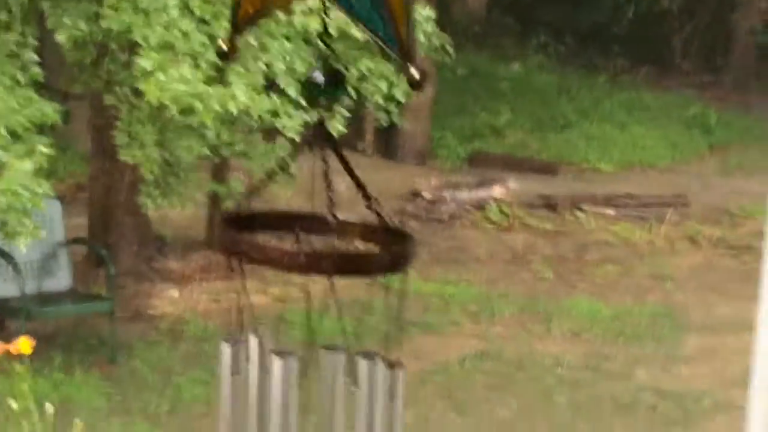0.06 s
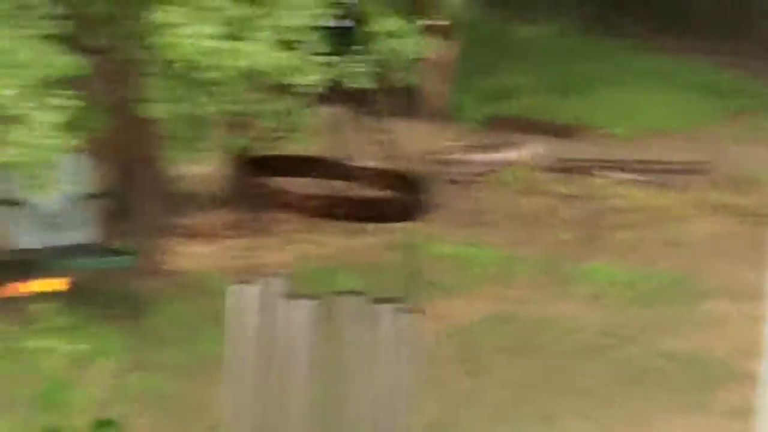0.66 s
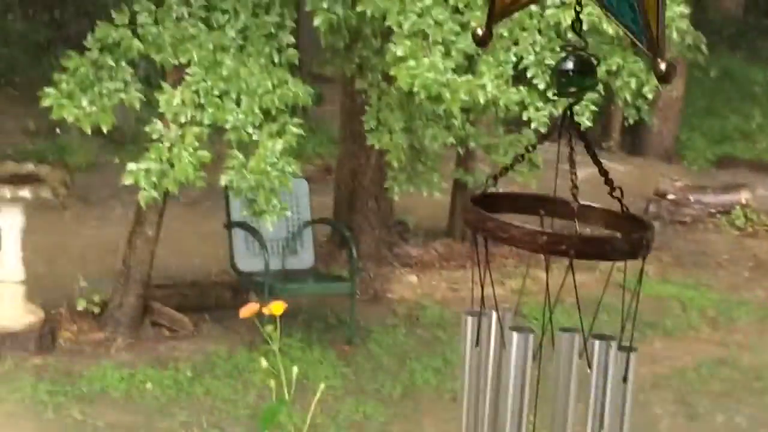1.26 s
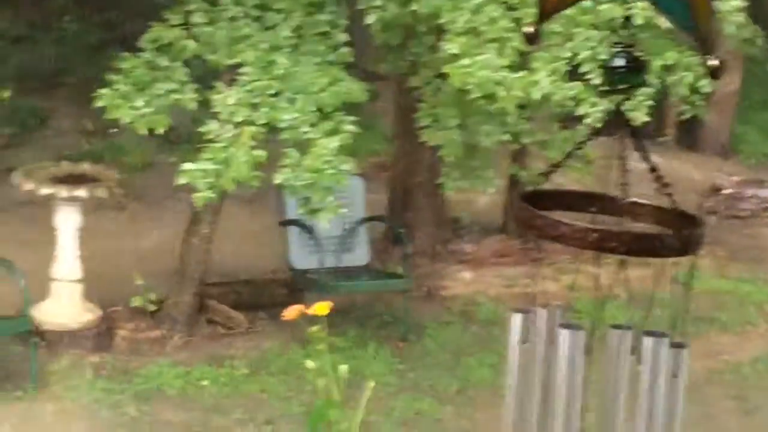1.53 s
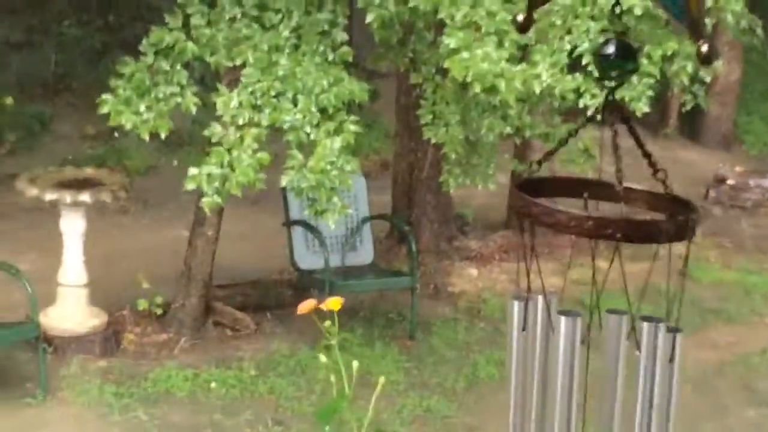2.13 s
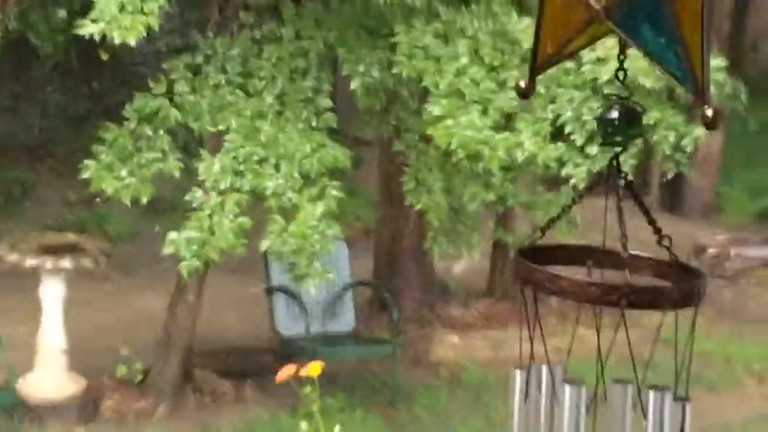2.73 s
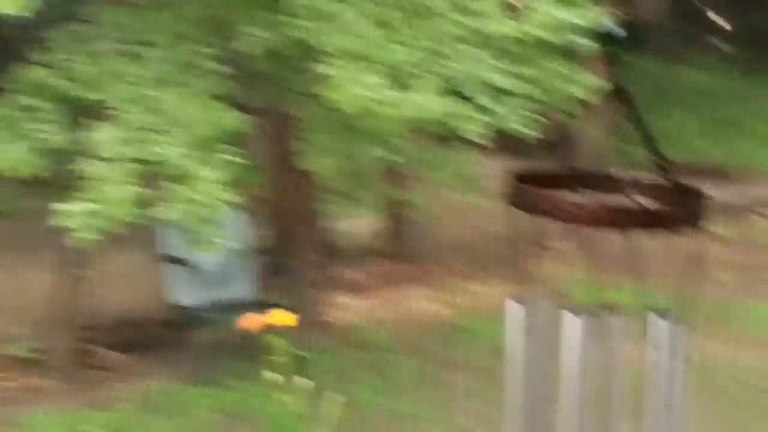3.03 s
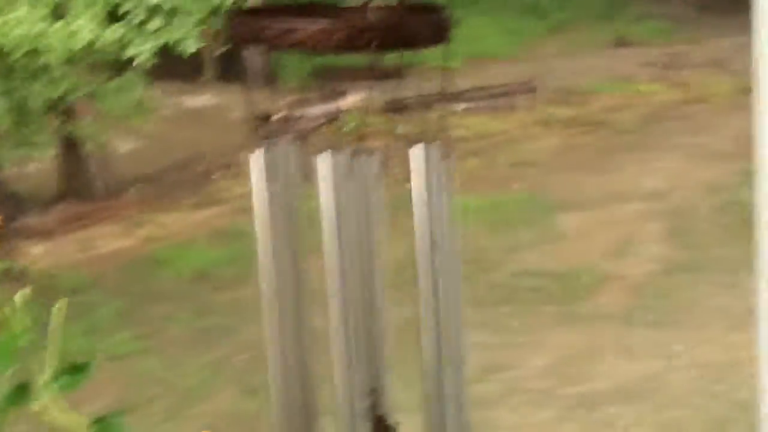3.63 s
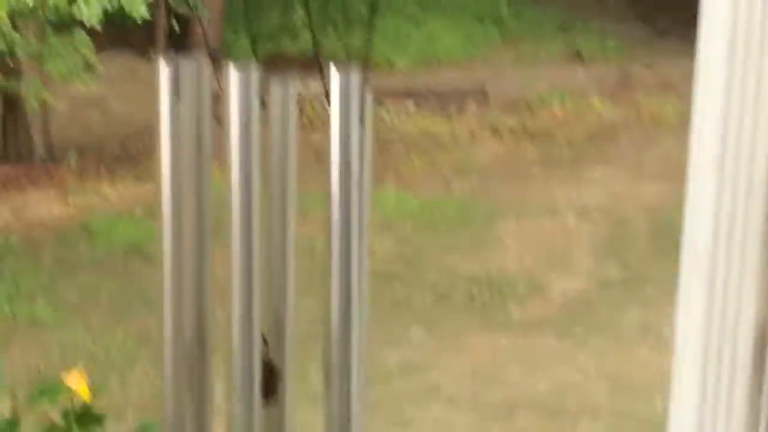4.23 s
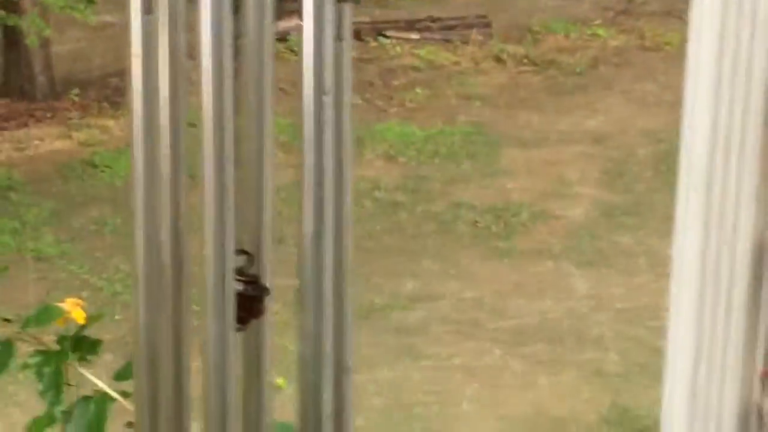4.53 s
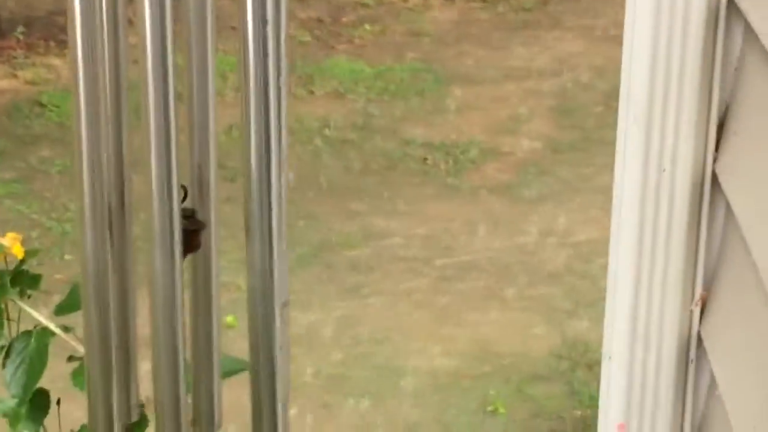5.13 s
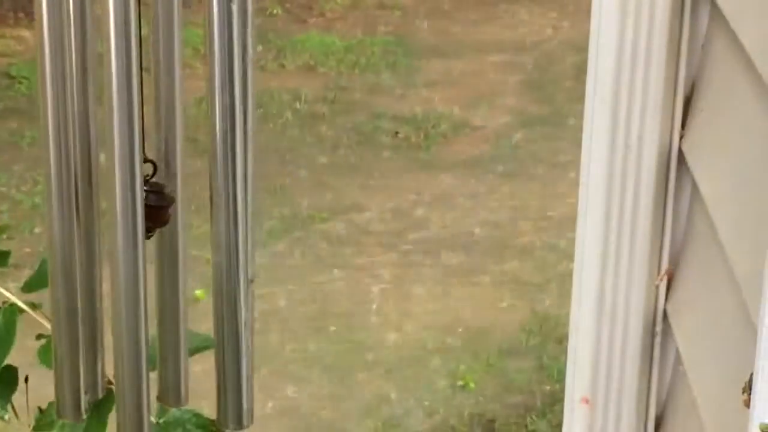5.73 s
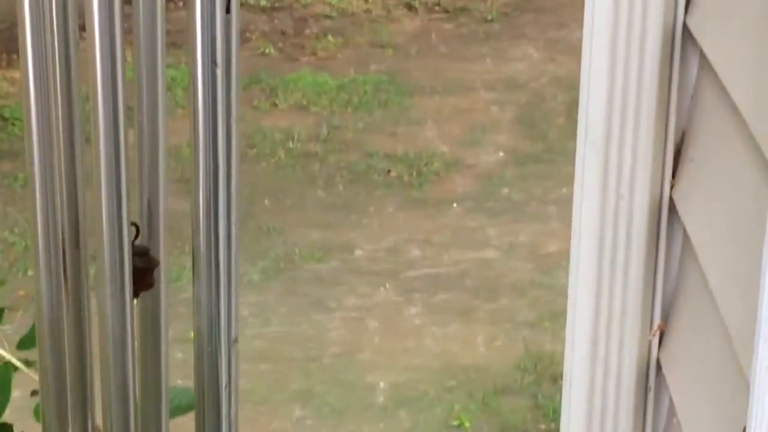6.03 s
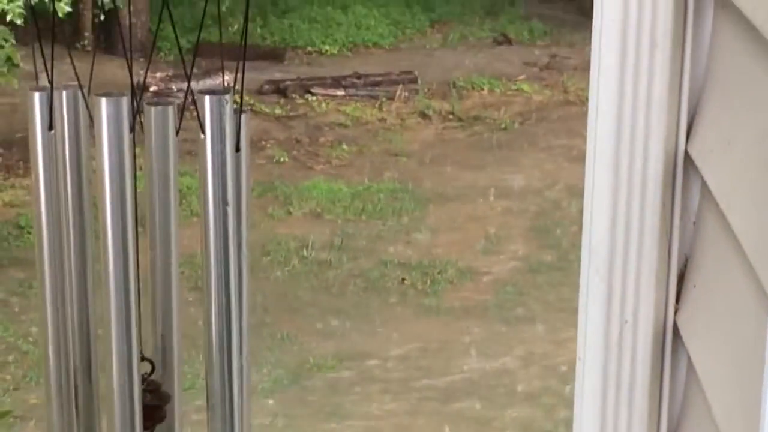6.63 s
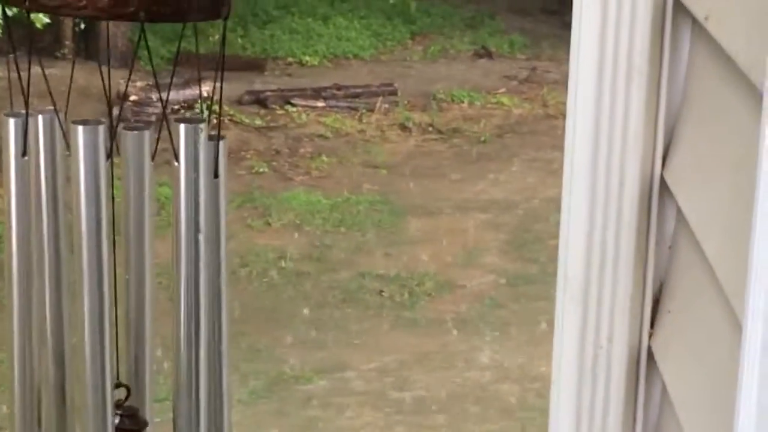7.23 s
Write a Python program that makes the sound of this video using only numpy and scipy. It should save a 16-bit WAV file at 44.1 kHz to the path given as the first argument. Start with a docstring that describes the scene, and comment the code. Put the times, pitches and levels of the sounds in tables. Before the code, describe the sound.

A steady downpour on leaves and puddles, then close thunder rips, cracks loudly and rolls on.

```python
"""Heavy rain falls on a flooded backyard, heard from a porch: countless impacts superpose into a wash. Near the
end lightning strikes: a side branch thuds and tears, then the main channel sends a volley of shock waves and a
crackling roll. A limiter lowers the gain under the clap, so the rain ducks. Close by, single drops tick on the
porch and runoff splashes; a low rumble, a low drone and soft bumps lie behind. One microphone feeds both
channels."""
import sys
import numpy as np
from scipy import signal
from scipy.fft import rfft, irfft
from scipy.io import wavfile

SR = 44100
rng = np.random.default_rng(int(sys.argv[2]) if len(sys.argv) > 2 else 0)


def wrap_up_sound(samples):
    """Save the sound to the file named by the first command line argument, as 16-bit audio."""
    columns = np.atleast_2d(samples).T
    # keep every value between -1 and 1, then stretch to whole-number steps
    tamed = np.clip(columns, -1, 1)
    steps = np.round(tamed * 32767).astype(np.int16)
    wavfile.write(sys.argv[1], SR, steps)


N = 325017
TIME = np.arange(N) / SR


# Spectrum of rain on leaves. Each row: frequency in Hz, relative spectral level in dB.
LEAF_SPECTRUM = [(260, -4.5), (325, 1.5), (410, -3.5), (530, -0.5), (780, -2), (940, -1), (1400, 1),
                 (2200, -3), (2900, -2), (3700, -2), (4700, -3.5), (7100, -4), (10000, -9), (15000, -16.5)]
# Spectrum of rain on the flooded yard. Each row: frequency in Hz, relative spectral level in dB.
YARD_SPECTRUM = [(260, -2.5), (400, -3), (450, -1), (520, -2.5), (700, -1), (1000, -0.5), (1900, 0.5),
                 (3700, -1.5), (4900, -3.5), (7300, -4.5), (10000, -9), (15000, -16)]
def rain(level_db=-39.5, turn_s=2.8, turn_length_s=0.59):
    """Incoherent sources add in power: the level holds as the microphone turns from trees to yard."""
    yard_share = np.interp(TIME, [turn_s, turn_s + turn_length_s], [0.13, 1])
    leaves = coloured(shower(per_s=3000, spread_db=3.0, near_db=-5.5, flutter_db=0.7), LEAF_SPECTRUM)
    yard = coloured(shower(per_s=3000, spread_db=3.5, near_db=-5.5, flutter_db=0.5), YARD_SPECTRUM)
    puddles = from_db(-14) * bubbles(per_s=180, quality=25)
    return from_db(level_db) * (np.sqrt(1 - yard_share) * leaves + np.sqrt(yard_share) * yard + puddles)


def shower(per_s, spread_db, near_db, flutter_db, count=16):
    """Superposition: far drops merge into Gaussian noise, while near ones stay distinct spatters."""
    near = rms_one(sum(scatter(impacts(per_s / count, spread_db), decay_s=0.00067) for _ in range(count)))
    direct = (rng.standard_normal(N) + from_db(near_db) * near) * from_db(flutter_db * drift(19))
    # fine spray close by comes in flurries
    flurries = rms_one(impacts(per_s=1500, spread_db=2.5) * from_db(5.5 * drift(14)))
    spray = from_db(-7.5) * butter(flurries, 12000, "high", order=3)
    porch_reflection = from_db(-17) * butter(scatter(direct, decay_s=0.017), 4300, "low")
    return direct + spray + porch_reflection


def bubbles(per_s, quality, count=24):
    """Bubble resonance: air trapped by drops in puddles rings briefly, each size at its own pitch."""
    rings = (resonance(impacts(per_s / count, 1.4), hz, hz / quality)
             for hz in np.geomspace(900, 7500, count))
    return rms_one(sum(rms_one(ring) for ring in rings))


# The strongest shock fronts. Each row: start in seconds, level in dB, duration in seconds.
SHOCK_FRONTS = [(6.656, -20, .0036), (6.674, -22, 0.0018), (6.692, -18, 0.0024), (6.718, -18, .0062),
                (6.845, 1, 0.00502), (6.848, -4, 0.0074), (6.858, 1.5, 0.0059), (6.892, 7, .0025),
                (6.919, 4.5, 0.0054), (6.949, 6, .0037), (6.966, 2.5, 0.0057), (7.014, 0, .0028),
                (7.048, 5.5, 0.00487), (7.102, 4, 0.004), (7.161, 2, .0054), (7.22, 4, .0031),
                (7.234, 5.5, .0046), (7.27, 3.5, 0.0024), (7.312, 2, .003)]
def shocks(air_cutoff_hz):
    """Each front is an N-wave, rounded by air absorption; the microphone loses its lowest part."""
    fronts = np.zeros(N)
    for start_s, db, length_s in SHOCK_FRONTS:
        add(fronts, start_s, from_db(db) * np.linspace(1, -1, int(length_s * SR)))
    rounded = butter(fronts, air_cutoff_hz, "low", order=4)
    return butter(rounded, 72, "high", order=3)


# Spectra of the thunder's four parts. Each row: frequency in Hz, relative spectral level in dB.
THUD_SPECTRUM = [(40, -17), (110, -6), (190, 2), (310, -11), (450, -1), (650, -17), (1000, -24)]
TEAR_SPECTRUM = [(400, -25), (800, -7), (1200, -1), (2400, -2), (4000, -11.5), (7000, -28.5), (12000, -55)]
BOOM_SPECTRUM = [(20, -27), (42, -7), (65, -6), (88, -2.5), (120, 1), (170, -1), (260, -3), (400, -12),
                 (600, -14), (1000, -21), (2000, -43)]
CRACKLE_SPECTRUM = [(250, -4), (450, -4), (680, -0.5), (1000, -6.5), (1500, -6), (2200, -16), (3200, -26),
                    (5000, -33.5), (8000, -40.5), (14000, -56)]
def thunder(branch_s=6.654, clap_s=6.838, roll_fall_db_per_s=0.7):
    """Every kink of the bolt sends a small shock; they superpose into thud, tearing, boom and crackle."""
    # a faint growl leads into the side branch: a hollow thud and a rip that hangs on
    growl = from_db(-36) * swell(start_s=6.6, rise_s=0.05, fall_db_per_s=roll_fall_db_per_s)
    thud = from_db(-28.5) * swell(branch_s, rise_s=0.0039, fall_db_per_s=102)
    rip = from_db(-29) * swell(branch_s, rise_s=0.045, fall_db_per_s=33)
    # the main channel booms at once; crackle and tearing build up after it
    boom = from_db(-10.5) * swell(clap_s, 0.03, roll_fall_db_per_s)
    crackle = from_db(-12.8) * swell(clap_s, 0.08, roll_fall_db_per_s)
    tear = from_db(-24) * swell(clap_s, 0.17, roll_fall_db_per_s)
    # each front drags a short rumble behind it and lifts the crackle
    wakes = sum(from_db(db) * swell(s, rise_s=0.0033, fall_db_per_s=400) for s, db, _ in SHOCK_FRONTS)
    bass = np.hypot(growl + boom, from_db(-13.5) * wakes)
    crackle *= np.hypot(1, from_db(-3) * wakes)
    tearing = ragged(impacts(per_s=3400, spread_db=1.0), patchy_db=3.0, rate_hz=28)
    roll = (thud * coloured(impacts(per_s=1500, spread_db=2.0), THUD_SPECTRUM)
            + np.hypot(rip, tear) * coloured(tearing, TEAR_SPECTRUM)
            + bass * coloured(impacts(per_s=1500, spread_db=2.0), BOOM_SPECTRUM)
            + crackle * coloured(impacts(per_s=2500, spread_db=0.5), CRACKLE_SPECTRUM))
    return ring_and_echo(roll + shocks(air_cutoff_hz=880))


def ragged(x, patchy_db, rate_hz, count=12):
    """Amplitude modulation, band by band: clusters of kinks favour one pitch, then another."""
    edges_hz = np.geomspace(350, 14000, count + 1)
    pairs = zip(edges_hz, edges_hz[1:])
    bands = [signal.sosfilt(signal.butter(2, p, "band", fs=SR, output="sos"), x + 1e-18) for p in pairs]
    return sum((-1) ** k * band * from_db(patchy_db * drift(rate_hz)) for k, band in enumerate(bands))


# Narrow peaks that give the thunder a hollow ring. Each row: frequency in Hz, width in Hz, gain in dB.
THUNDER_RESONANCES = [(86, 19, -10), (172.4, 41, -1.5), (317, 30, -12), (457, 43, -9), (683, 50, -10),
                      (927, 51, -4)]
# Reflections from porch, house and trees. Each row: delay in seconds, gain in dB.
REFLECTIONS = [(.0128, -20), (.029, -23.5), (.071, -16)]
def ring_and_echo(x):
    """Resonance and reflection: a hollow ring and delayed copies join the direct sound."""
    out = x + sum(from_db(db) * resonance(x, hz, width_hz) for hz, width_hz, db in THUNDER_RESONANCES)
    for delay_s, db in REFLECTIONS:
        add(out, delay_s, from_db(db) * x)
    return out


# Drops that hit the porch. Each row: start in seconds, level in dB before the high-pass.
PORCH_DROPS = [(.102, -18), (.188, -15), (.42, -21), (1.271, -24), (1.901, -18), (1.939, -20), (4.566, -18),
               (6.04, -11)]
def ticks(pitch_range_hz, decay_s):
    """A short impact has a wide spectrum: a drop on a hard surface snaps for about one cycle."""
    out, t = np.zeros(N), TIME[:SR // 100]
    for start_s, db in PORCH_DROPS:
        hz = rng.uniform(*pitch_range_hz)
        add(out, start_s, from_db(db) * np.exp(-t / decay_s) * np.cos(2 * np.pi * hz * t))
    return butter(out, 5000, "high")


# Runoff from the roof edge. Each row: start in seconds, level in dB, centre frequency in Hz.
RUNOFF = [(.106, -36.5, 2740), (.181, -34.5, 2850), (.48, -36, 4600), (.65, -37, 6500), (1.091, -38, 5000),
          (1.286, -35.5, 4700), (1.987, -35, 6500), (2.938, -35.5, 5200), (3.47, -40, 3600),
          (4.04, -40, 3100), (4.305, -35, 5500), (5.142, -39, 4600), (6.326, -36, 4400)]
def splashes(rise_s, decay_s, plop_hz=2600, widening=2.5, droplets_per_s=12000):
    """Break-up on impact: a whole blob plops; the finer it bursts, the higher and wider its band."""
    out, t = np.zeros(N), TIME[:SR // 5]
    envelope = (1 - np.exp(-t / rise_s)) * np.exp(-t / decay_s)
    for start_s, db, hz in RUNOFF:
        droplets = rng.standard_normal(len(t)) * (rng.random(len(t)) < droplets_per_s / SR)
        width_hz = max(widening * (hz - plop_hz), 250)
        spray = rms_one(butter(resonance(droplets, hz, width_hz), 10400, "low"))
        add(out, start_s, from_db(db) * envelope * spray)
    return out


# Spectrum of the rumble behind the rain. Each row: frequency in Hz, relative spectral level in dB.
RUMBLE_SPECTRUM = [(20, -28), (40, -5), (65, -1), (110, 0), (150, -2), (205, -0.5), (260, -6), (330, -16)]
def rumble(level_db=-50, flutter_db=1.3):
    """Filtered noise: a low band whose level wavers slightly."""
    noise = rng.standard_normal(N) * from_db(flutter_db * drift(8.6))
    return from_db(level_db) * coloured(noise, RUMBLE_SPECTRUM)


# Swelling and fading of a low drone. Each row: time in seconds, level in dB.
DRONE_LEVELS = [(0, -56), (.8, -64), (1.35, -52), (2.1, -68), (2.85, -56), (3.9, -59), (4.45, -49),
                (5.0, -57), (6.5, -52)]
def drone(pitch_hz=78, waver_hz=5.77):
    """Random frequency and amplitude modulation make a bass tone waver."""
    phase = 2 * np.pi * np.cumsum(pitch_hz + waver_hz * drift(13.8)) / SR
    level_db = np.interp(TIME, *np.transpose(DRONE_LEVELS)) + 1.7 * drift(20)
    return from_db(level_db) * rms_one(np.sin(phase))


# Soft low bumps. Each row: start in seconds, envelope peak in dB.
BUMPS = [(.89, -41), (1.585, -46), (3.295, -40), (4.126, -38.5), (5.251, -37.5), (6.095, -38)]
def thumps(mean_hz, rise_s, decay_s):
    """Damped oscillation: each dull bump dies within a few cycles."""
    out, t = np.zeros(N), TIME[:SR // 3]
    envelope = (1 - np.exp(-t / rise_s)) * np.exp(-t / decay_s)
    envelope /= envelope.max()
    for start_s, db in BUMPS:
        hz = mean_hz * rng.uniform(0.86, 1.14)
        add(out, start_s, from_db(db) * envelope * np.sin(2 * np.pi * hz * t))
    return out


def impacts(per_s, spread_db):
    """A Poisson process: clicks at random moments, many small and a few large; unit power."""
    sizes = from_db(spread_db * np.minimum(rng.exponential(1, N), 5)) * rng.choice([-1, 1], N)
    return rms_one(sizes * (rng.random(N) < per_s / SR))


def scatter(x, decay_s):
    """Convolution with dying noise smears every click into a burst; unit power."""
    t = TIME[:SR // 20]
    burst = rng.standard_normal(len(t)) * np.exp(-t / decay_s)
    return rms_one(signal.fftconvolve(x, burst)[:N])


def swell(start_s, rise_s, fall_db_per_s):
    """An envelope with an S-shaped rise and exponential decay."""
    t = np.maximum(TIME - start_s, 0)
    return (1 - np.exp(-(t / rise_s) ** 2)) * from_db(-fall_db_per_s * t)


def drift(rate_hz):
    """Low-passed noise: a slow random fluctuation of unit power."""
    hz = np.arange(N // 2 + 1) * SR / N
    return rms_one(irfft(rfft(rng.standard_normal(N)) / (1 + (hz / rate_hz) ** 2), N))


def coloured(x, spectrum, skirt_db_per_octave=36):
    """Spectral shaping by a curve that falls away beyond its ends; unit power."""
    hz, db = np.transpose(spectrum)
    octave = np.log2(np.maximum(np.arange(N // 2 + 1) * SR / N, 1))
    beyond = np.abs(octave - np.clip(octave, np.log2(hz[0]), np.log2(hz[-1])))
    gain_db = np.interp(octave, np.log2(hz), db) - skirt_db_per_octave * beyond
    return rms_one(irfft(rfft(x) * from_db(gain_db), N))


def resonance(x, hz, width_hz):
    """A two-pole resonator with unit gain at its peak."""
    radius = np.exp(-np.pi * width_hz / SR)
    feedforward = np.array([1, 0, -1]) * (1 - radius ** 2) / 2
    feedback = [1, -2 * radius * np.cos(2 * np.pi * hz / SR), radius ** 2]
    return signal.lfilter(feedforward, feedback, x + 1e-18)


def butter(x, hz, kind, order=2):
    """A causal, maximally flat low- or high-pass."""
    return signal.sosfilt(signal.butter(order, hz, kind, fs=SR, output="sos"), x + 1e-18)


def add(track, start_s, sound):
    """Superpose a sound on the track from start_s on."""
    start = int(np.clip(round(start_s * SR), 0, N - 1))
    track[start:start + len(sound)] += sound[:N - start]


def from_db(db):
    """Decibels to amplitude ratio."""
    return 10 ** (np.asarray(db) / 20)


def rms_one(x):
    """Scale to unit power."""
    return x / np.sqrt(np.mean(x ** 2) + 1e-20)


def scene():
    """Linear superposition: the pressures of all sources add at one microphone."""
    drops = ticks(pitch_range_hz=(5670, 7770), decay_s=0.00008) + splashes(rise_s=0.0028, decay_s=0.015)
    bass = drone() + thumps(mean_hz=80, rise_s=0.012, decay_s=0.019)
    mono = rain() + rumble() + thunder() + drops + bass
    return np.array([mono, mono])


def limiter(x, ceiling_db, release_db_per_s, attack_s):
    """Automatic gain control: the gain drops quickly under a peak and creeps back."""
    excess_db = np.maximum(20 * np.log10(np.abs(x).max(axis=0) + 1e-9) - ceiling_db, 0)
    held_db = np.maximum.accumulate(excess_db + release_db_per_s * TIME) - release_db_per_s * TIME
    pole = np.exp(-1 / (attack_s * SR))
    return x * from_db(-signal.lfilter([1 - pole], [1, -pole], held_db))


def record(dry):
    """Limiting and soft saturation round the peaks; a steep low-pass cuts the highest treble."""
    saturation, cutoff_hz = 0.76, 15400
    limited = limiter(dry, ceiling_db=-2.5, release_db_per_s=4.0, attack_s=0.00075)
    rounded = saturation * np.tanh(limited / saturation)
    return signal.sosfilt(signal.ellip(12, 0.1, 80, cutoff_hz, fs=SR, output="sos"), rounded)


dry = scene()
out = record(dry)
wrap_up_sound(out)
```